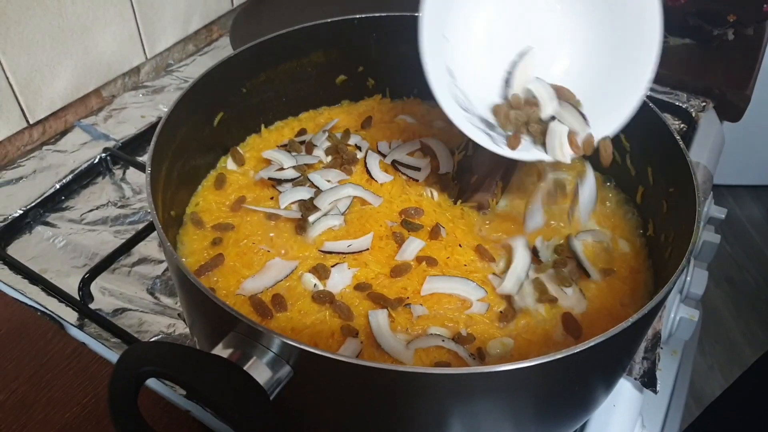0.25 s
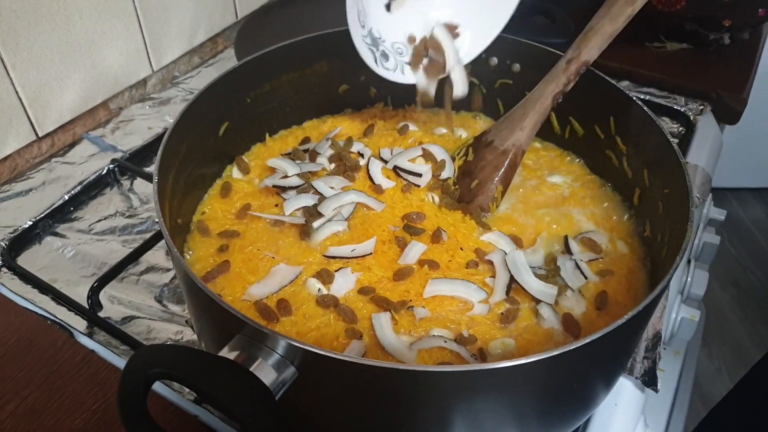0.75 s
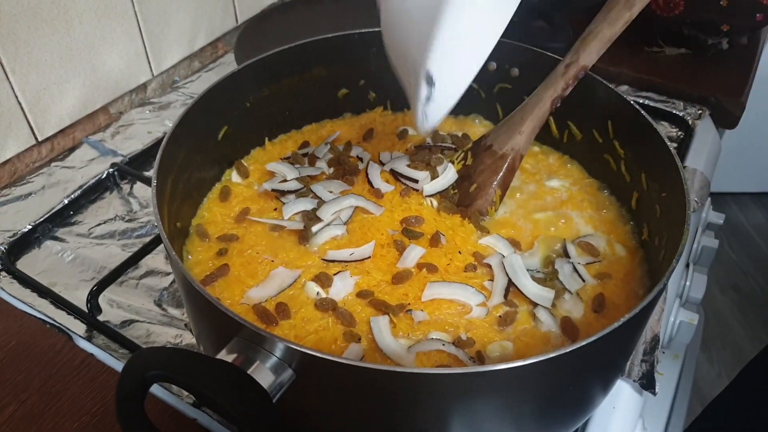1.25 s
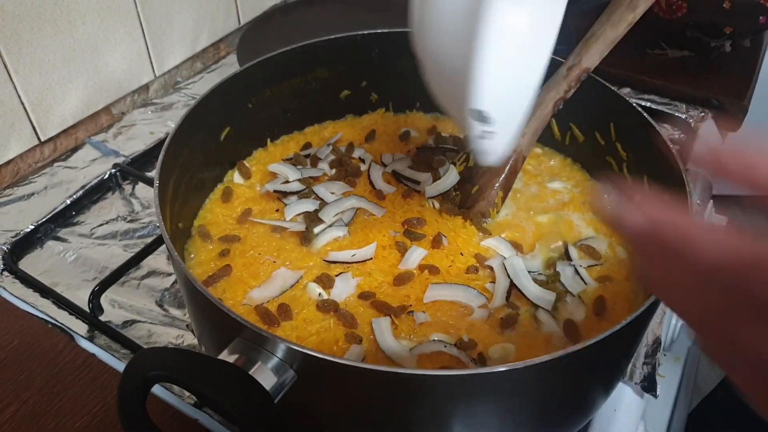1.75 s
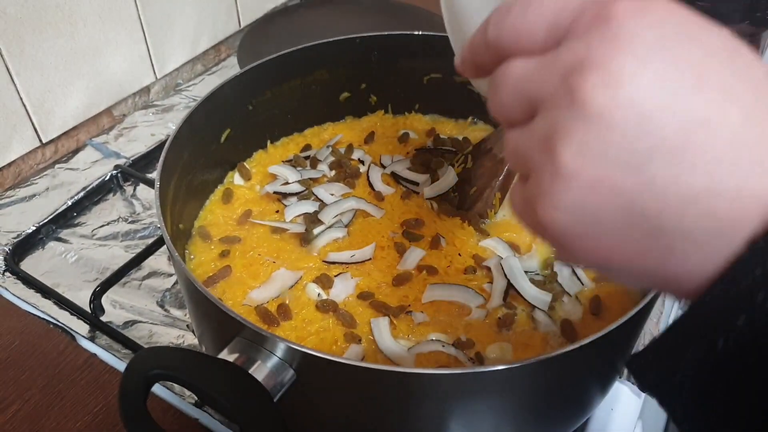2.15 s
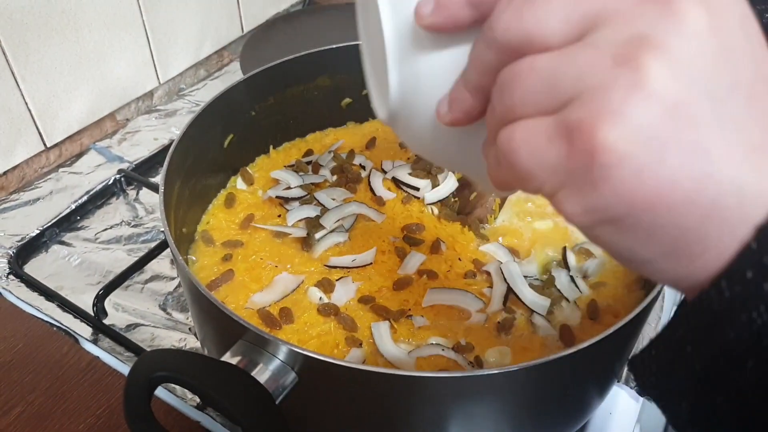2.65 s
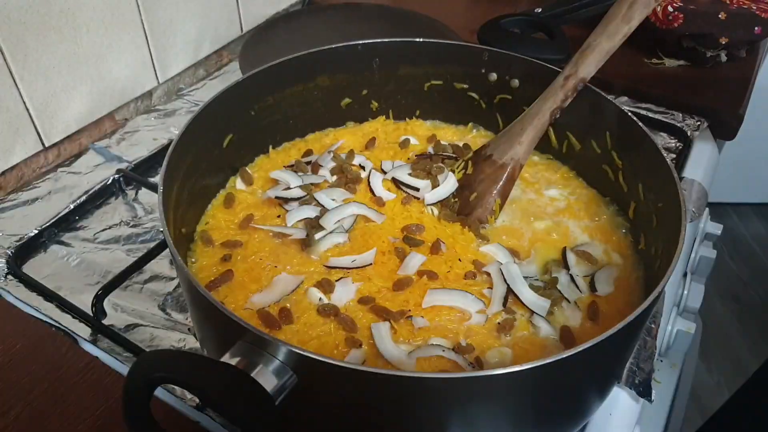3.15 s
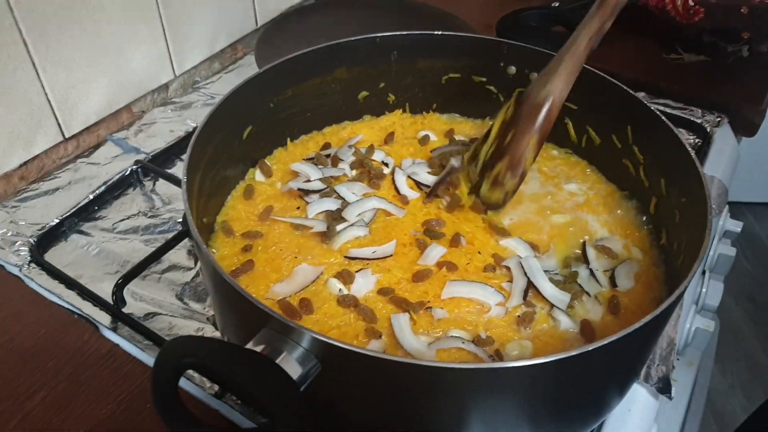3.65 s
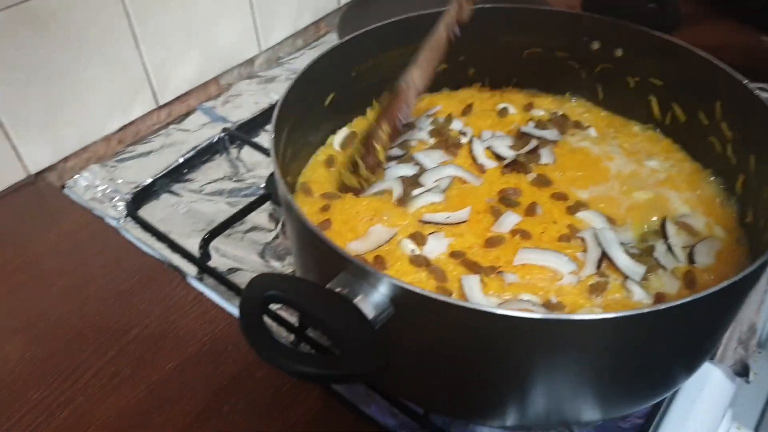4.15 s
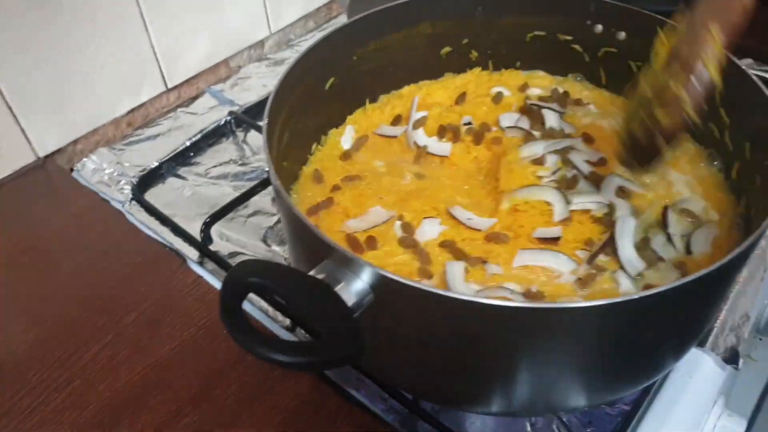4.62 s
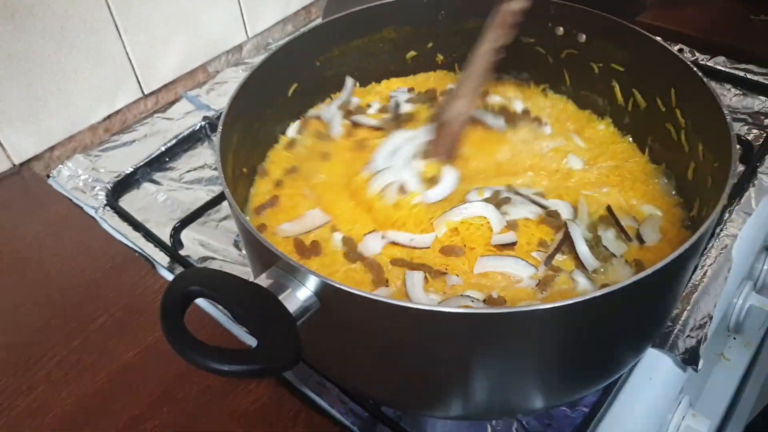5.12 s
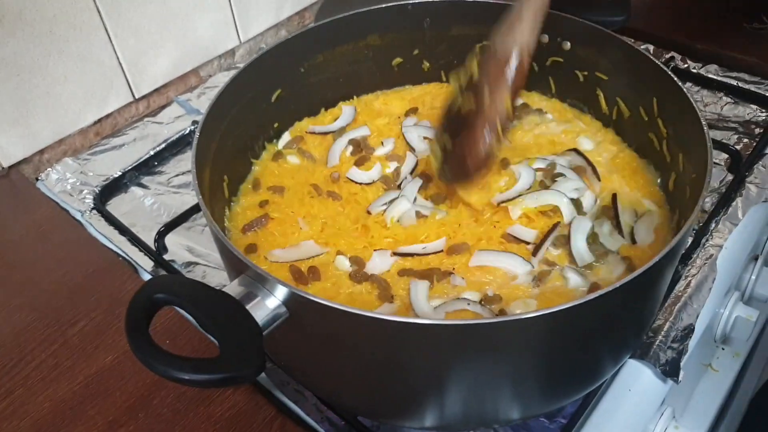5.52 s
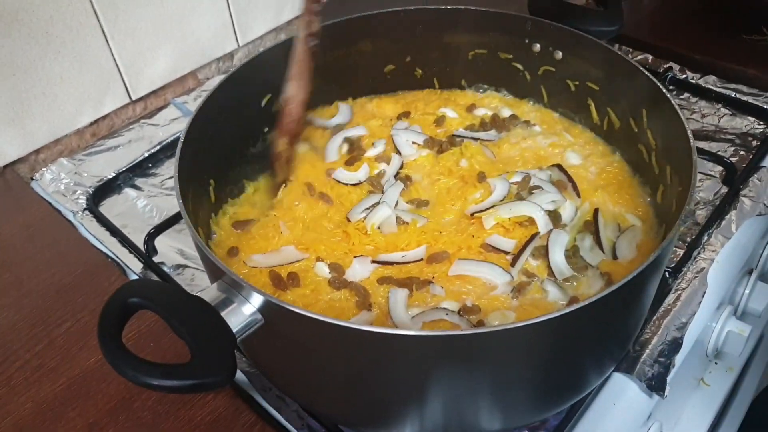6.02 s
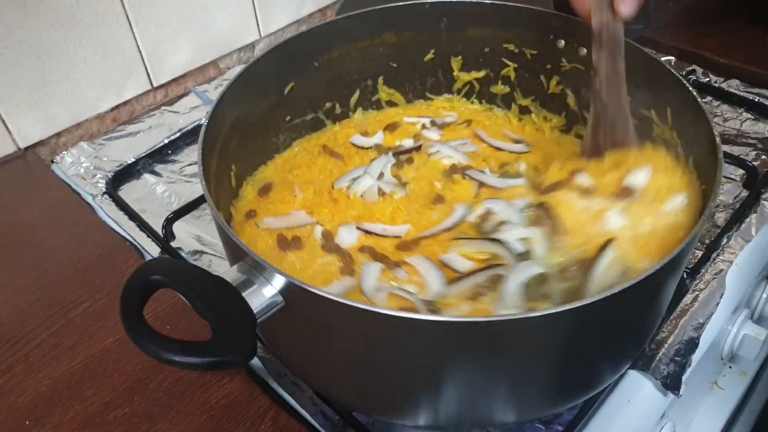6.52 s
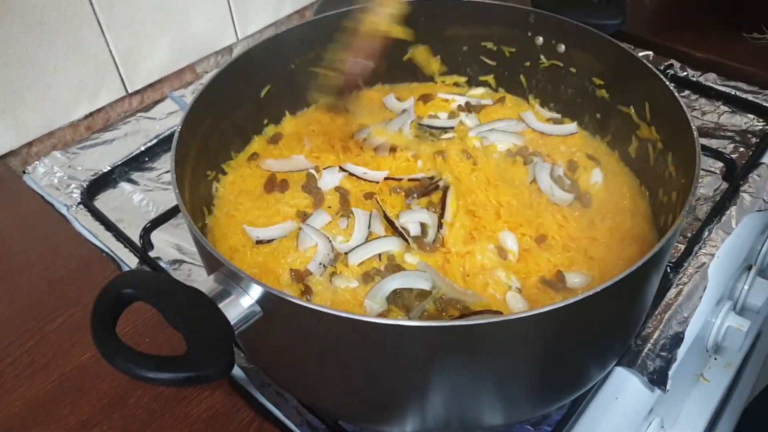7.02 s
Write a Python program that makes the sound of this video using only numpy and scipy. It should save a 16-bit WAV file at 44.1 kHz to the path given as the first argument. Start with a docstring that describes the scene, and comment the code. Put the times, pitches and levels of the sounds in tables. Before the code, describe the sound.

Close in a small kitchen, thick wet rice simmers in a steel pot: dense soft bubbling, fine fizz, single plops and droplets spitting on hot metal, with a faint low gas flame. Near the middle a wooden spoon strikes sharply and the pot rings briefly. Stirring follows, with hollow drags, duller knocks and wet bumps. Heard in stereo by a nearby phone microphone.

```python
"""Wet rice simmers in a steel pot: dense coloured noise and clicks, with single bubbles and droplets on top.
A gas flame rumbles below, as low filtered noise.
A wooden spoon knocks the floor and wall (noise bursts plus dying sines) and drags through the rice
(noise through a gliding hollow resonance, with short wet bumps), so the steel rings.
Two microphone ports of a phone hear it from close by in a small kitchen."""
import sys
import numpy as np
from scipy import signal
from scipy.fft import rfft, irfft, next_fast_len
from scipy.io import wavfile
from scipy.ndimage import uniform_filter1d

SR = 44100
rng = np.random.default_rng(int(sys.argv[2]) if len(sys.argv) > 2 else 0)


def store_wav(level_fs):
    """Save 16-bit WAV to argv[1]."""
    pcm = np.round(np.clip(np.atleast_2d(level_fs), -1, 1) * 32767)
    wavfile.write(sys.argv[1], SR, pcm.T.astype(np.int16))


N = 320871


def amp(db):
    """Decibels to amplitude factor."""
    return 10 ** (np.asarray(db) / 20)


def evened(x):
    """Scale to RMS 1."""
    return x / np.sqrt(np.mean(x ** 2) + 1e-20)


def read(points, hz):
    """Interpolate (Hz, value) points over log frequency."""
    point_hz, value = np.transpose(points)
    return np.interp(np.log(hz + 1), np.log(point_hz + 1), value)


def add(mix, start_s, sound):
    """Add a sound to the mix in place, cut at the end of the mix."""
    part = mix[round(start_s * SR):][:len(sound)]
    part += sound[:len(part)]


def coloured(x, spectrum):
    """Minimum-phase filter of energy 1: a click starts sharply and rings afterwards."""
    hz = abs(np.fft.fftfreq(4096, 1 / SR))
    log_gain = np.log(amp(np.maximum(read(spectrum, hz), -100)))
    taps = np.fft.ifft(np.exp(np.conj(signal.hilbert(log_gain)))).real[:2048]
    return signal.oaconvolve(x, taps / np.linalg.norm(taps))[:len(x)]


def resonate(x, hz, width_hz):
    """Resonance on a fixed or gliding pitch: shift it down to 0 Hz, smooth, shift back."""
    turn = np.exp(2j * np.pi * np.cumsum(hz * np.ones(len(x))) / SR)
    pole = np.exp(-np.pi * width_hz / SR)
    smoothed = signal.lfilter([1 - pole], [1, -pole], x / turn)
    return 2 * (turn * smoothed).real


def ringing(hz, db, t60_s):
    """Half a second of summed, exponentially dying sines, one a mode."""
    t = np.arange(SR // 2)[:, None] / SR
    return (amp(db - 60 * t / t60_s) * np.sin(2 * np.pi * hz * t)).sum(1)


def grains(per_s, spread_db):
    """Random clicks of either sign, a few of them large."""
    sign = rng.choice([-1, 1], N)
    size = amp(spread_db * np.minimum(rng.exponential(1, N), 4))
    return sign * size * (rng.random(N) < per_s / SR)


def puff(decay_s, rise_s=0.00018):
    """Noise with a linear rise and an exponential decay of at least 0.5 ms."""
    t = np.arange(SR // 8) / SR
    noise = rng.standard_normal(len(t))
    return noise * np.exp(-t / max(decay_s, .0005)) * np.minimum(t / rise_s, 1)


def uneven(size):
    """Slow noise of RMS 1: white noise smoothed twice over size samples."""
    return evened(uniform_filter1d(uniform_filter1d(rng.standard_normal(N), size), size))


def scattered_rows(count, db):
    """Random start seconds, levels near db, and pitch factors."""
    s, size, pitch = rng.random((count, 3)).T
    return s * N / SR, db + 2.2 * (size - .5), 2 ** (1.5 * pitch - .4)


# How hard the pot simmers. Each row: time in s, bubbling level in dB, fizz level in dB.
SIMMER_LEVELS = [(0, -52.5, -53), (.65, -49, -52), (2.3, -49.5, -51), (3.8, -48, -51), (5.3, -49.5, -52),
                 (6.25, -48, -50.5), (6.7, -50.5, -48), (6.9, -53.5, -53), (7.27, -53, -52)]
# Spectrum of the small bubbles. Each row: frequency in Hz, density in dB per Hz.
BUBBLING_SPECTRUM = [(88, -35), (150, -0.5), (400, -2.5), (558, 0), (659, -5.5), (875, -5), (1590, -11),
                     (2450, -13.5), (3420, -19), (5370, -46), (8000, -33), (10400, -98), (17600, -120)]
# Spectrum of water on hot steel, including the colour of the microphone.
# Each row: frequency in Hz, density in dB per Hz.
FIZZ_SPECTRUM = [(1760, -11), (3000, -9.5), (5490, -8.5), (7410, -21), (7830, -40), (8160, -21),
                 (8750, -14), (10500, -7), (13700, -3), (15800, -3.5)]
# Spectrum of the gas flame. Each row: frequency in Hz, density in dB per Hz.
FLAME_SPECTRUM = [(12, -57), (20, -40), (40, -7.5), (65, 0), (155, -2), (189, -13), (259, -27), (300, -3.5),
                  (390, -18.5), (660, -120)]
FLAME_DB = -51  # RMS


def simmer():
    """Many small bubbles come in clumps; fizz crackles on the hot wall; the flame rumbles steadily."""
    s, *columns = np.transpose(SIMMER_LEVELS)
    bubbling_db, fizz_db = (np.interp(np.arange(N) / SR, s, column) for column in columns)
    clumps = uneven(size=900)
    paths = []
    for path in range(2):  # spread over the whole pot, so each path carries other bubbles
        bubbles = rng.standard_normal(N) + 0.7 * evened(grains(per_s=600, spread_db=4.0))
        fizz = rng.standard_normal(N) + 0.26 * evened(grains(per_s=750, spread_db=1.0))
        flame = rng.standard_normal(N)
        paths.append(amp(bubbling_db + 1.76 * clumps) * evened(coloured(bubbles, BUBBLING_SPECTRUM))
                     + amp(fizz_db + 1.6 * clumps) * evened(coloured(fizz, FIZZ_SPECTRUM))
                     + amp(FLAME_DB) * evened(coloured(flame, FLAME_SPECTRUM)))
    return np.array(paths)


# Larger bubbles that burst, and short wet bumps under the dragging spoon. Each row: start in s,
# peak of the body in dB, starting pitch in Hz, decay in ms, spray against body in dB before colouring.
BURST_EVENTS = [(0.07, -48.5, 1820, 4.6, 9.5), (0.203, -42, 790, 6.8, -1), (0.329, -42.5, 797, 7.5, 2),
                (0.455, -35, 840, 5.4, -18), (0.802, -33, 930, 7.1, -9), (0.942, -31, 1250, 4, -4.5),
                (1.098, -42, 1870, 3, -9), (1.121, -38.5, 1010, 4, -12), (1.135, -33.5, 825, 1.1, -21),
                (1.312, -34.5, 1000, 4.3, -8), (1.325, -38.5, 820, 6.6, 2), (1.359, -34.5, 960, 3, -18),
                (1.376, -45, 900, 3.4, -6), (1.664, -45, 920, 4.9, 11.5), (1.995, -37.5, 850, 5.7, -13),
                (2.081, -36, 850, 3.1, -7), (2.896, -36, 660, 2.3, -18), (3.215, -32.5, 354, 8.8, -6),
                (3.368, -39, 880, 2, -15), (3.625, -38, 1860, 3, -2), (3.926, -42, 1140, 8.8, 5),
                (4.917, -46, 2170, 6.7, -5), (5.222, -42.5, 2090, 12, -9), (6.071, -41.5, 1780, 7, 1),
                (6.302, -49, 750, 4.2, -18), (6.35, -42, 700, 4.3, -18), (6.37, -51, 750, 6.1, -22),
                (6.449, -54, 730, 9.1, -18), (6.608, -33.5, 2330, 3.3, -14), (6.654, -33.5, 1290, 3.8, -18),
                (6.746, -36.5, 1220, 7.3, 2.5)]
# Spectrum of the spray of a burst. Each row: frequency in Hz, density in dB per Hz.
SPRAY_SPECTRUM = [(200, -14), (500, 12), (1200, 0), (2600, 6), (4000, -14), (7800, -23), (12000, -11),
                  (16000, -10)]
# the bursts left to chance; level and pitch scatter around these
SMALL_BURST_DB, SMALL_BURST_HZ, SMALL_BURST_MS, SMALL_SPRAY_DB = -52.5, 900, 3.7, 1


def bursts():
    """A bubble or wet bump gives a puff around a rising pitch and a little spray of noise."""
    body, spray = np.zeros(N), np.zeros(N)
    starts, levels, pitches = scattered_rows(count=16, db=SMALL_BURST_DB)
    small = [(*row, SMALL_BURST_MS, SMALL_SPRAY_DB)
             for row in zip(starts, levels, SMALL_BURST_HZ * pitches)]
    for s, db, hz, decay_ms, spray_db in [*BURST_EVENTS, *small]:
        air = puff(decay_ms / 1000, rise_s=0.6 * decay_ms / 1000)
        pitch_rise = 1 + np.minimum(10 * np.arange(len(air)) / SR, .4)
        tone = resonate(air, hz * pitch_rise, 0.29 * hz)
        add(body, s, amp(db) * tone / abs(tone).max())
        add(spray, s, amp(db + spray_db) * air)
    return body + coloured(spray, SPRAY_SPECTRUM)


# Droplets that spit on hot steel. Each row: start in s, level in dB before colouring.
SPIT_EVENTS = [(0.212, -38.5), (0.231, -44), (0.358, -46), (0.635, -43), (0.679, -37.5), (0.77, -43),
               (0.8195, -36), (0.943, -32), (2.411, -38.5), (2.667, -39), (3.721, -36.5), (3.9386, -34.5),
               (4.328, -39.5), (6.298, -35), (6.748, -35)]
SPIT_DECAY_S = 0.0094
SMALL_SPIT_DB = -59  # the droplets left to chance scatter around this


def spits():
    """A droplet on hot steel gives a short bright crack of noise."""
    out = np.zeros(N)
    small = zip(*scattered_rows(count=16, db=SMALL_SPIT_DB)[:2])
    for s, db in [*SPIT_EVENTS, *small]:
        add(out, s, amp(db) * puff(SPIT_DECAY_S, rise_s=0.0011))
    return coloured(out, FIZZ_SPECTRUM)


# Spoon on pot. Each row: start in s, blow level in dB, wood tone in Hz, thud against blow in dB,
# side of the grate 0 to 1, bare steel 0 to 1 (0 is rice), place 0 floor, 1 low wall, 2 high wall,
# ring level in dB, crack against blow in dB.
KNOCK_EVENTS = [(3.959, -8, 1140, -10, 0, 0.95, 0, -24.5, -8),
                (3.992, -23.5, 590, -23, 0, 1, 0.32, -37, -20),
                (4.033, -25, 1780, -3, 0.1, 0.92, 1.2, -41, -7.5),
                (4.074, -33, 1230, -4, 0, 0.7, 0.14, -47, -12),
                (4.178, -40, 1942, -30, 0, .85, 1, -38, -40), (4.232, -36, 2350, -20, 0, 0.85, 0, -35, -35),
                (4.546, -20, 427, -7, 0, 0.25, 0, -22, -50), (4.56, -17, 830, -11, .3, 0.2, 0, -23, -55),
                (4.589, -30, 870, -4, 0, 0.2, 0, -35, -40), (4.772, -28, 400, 1, 0.64, 0.08, 0, -31.5, -45),
                (4.79, -42, 175, 10.5, 1, 0, 0, -45, -45),
                (5.446, -21, 2100, -20, 0, 1, 0.95, -29.5, -10.5),
                (5.466, -25, 1900, -24, 0, 0.8, 1, -38, -22),
                (5.642, -27.5, 2240, -29, 0, 0.93, 1.76, -34, -14)]
# Modes of the steel pot, one column a mode. Rows: frequency in Hz, floor blow in dB,
# low wall blow in dB, high wall blow in dB, rubbed in dB, t60 in s.
POT_MODES = [(415, 851, 1707, 1868, 1958, 2326, 3295, 3862, 4500, 4953, 5157, 5712, 6880, 9320, 11300, 12030, 13435, 14930),
             (-10, -13, -6, -26, -22, -1, -25, -14, -16, -30, -13, -8, -30, -18, -22, -30, -30, -24),
             (-20, -12, -18, -14, 0, -6, -6, -26, -22, -30, -19, -22, -18, -20, -15, -14, -9, -15),
             (-14, -20, -30, -5, -24, -9, -6, -8, -30, -9, -24, -4, -30, -17, -30, -5, -13, -18),
             (-30, -14, -30, -5, -30, -15, -24, -20, -30, -13, -30, -1, -30, -7, -22, -24, 0, -4),
             (.27, .3, .18, .4, .2, .4, .22, .24, .12, .18, .22, .24, .17, .4, .15, .09, .4, .3)]
# The pot rocking on its grate, one column a mode. Rows: frequency in Hz, one side in dB,
# other side in dB, t60 in s.
GRATE_MODES = [(129, 170, 195, 88), (0, -6, -7, -14), (-12, -2, -14, -4), (.25, .2, .25, .5)]
# Spectrum of the wooden blow. Each row: frequency in Hz, density in dB per Hz.
WOOD_SPECTRUM = [(150, -36), (300, 8), (1200, -3.5), (2500, -2.5), (4000, -13.5), (6000, -17), (8000, -79)]
CLATTER_DECAY_S, CLATTER_DOUBLES_DB = 0.0016, -11  # decay at 0 dB; doubles for a blow this much softer
BARE_RISE_S, RICE_RISE_S = 0.002, 0.004  # rice softens the start of a blow
RICE_RING_DB_PER_OCTAVE = -14  # ring lost through rice, above the lowest mode
RICE_LOWPASS_HZ = 1300  # wood lowpass through rice; 8 times higher on bare steel
SHIMMER_DECAY_S, SHIMMER_DB = 0.015, -6  # small modes of the steel, too dense to tell apart


def knocks():
    """Wood clatters on steel; the pot rings by where it is struck, rice muffles it, and the grate thuds."""
    hz, *places_db, _, t60_s = np.array(POT_MODES)
    rock_hz, one_db, other_db, rock_t60_s = np.array(GRATE_MODES)
    t = np.arange(SR // 2) / SR
    heave = 1 - np.exp(-(t / 0.0063) ** 2)  # the heavy pot takes a moment to move
    swing = 1 - np.exp(-t / 0.0017)  # the steel swings freely once the spoon has left it
    clatter, ring = np.zeros((2, N))
    for s, db, wood_hz, thud_db, side, bare, place, ring_db, crack_db in KNOCK_EVENTS:
        rise_s = np.interp(bare, (0, 1), (RICE_RISE_S, BARE_RISE_S))
        blow = puff(CLATTER_DECAY_S * 2 ** (db / CLATTER_DOUBLES_DB), rise_s)

        mode_db = np.array([np.interp(place, (0, 1, 2), column) for column in np.transpose(places_db)])
        rice_db = RICE_RING_DB_PER_OCTAVE * (1 - bare) * np.log2(hz / hz[0])
        add(ring, s, swing * ringing(hz, ring_db + mode_db + rice_db, t60_s))

        rock_db = thud_db + one_db + side * (other_db - one_db)
        sound = heave * ringing(rock_hz, rock_db, rock_t60_s)

        tone = resonate(blow, wood_hz, 0.086 * wood_hz)
        wood = .5 * tone / abs(tone).max() + amp(-3.0) * coloured(blow, WOOD_SPECTRUM)
        lowpass = signal.butter(3, RICE_LOWPASS_HZ * 8 ** np.clip(bare, 0, 1), fs=SR)
        add(sound, 0, signal.lfilter(*lowpass, wood))

        crack = coloured(blow + amp(SHIMMER_DB) * puff(SHIMMER_DECAY_S), FIZZ_SPECTRUM)
        crack = signal.lfilter([1], [1, -.65], crack)  # duller than a spitting droplet
        add(sound, 0, amp(crack_db) * crack)
        add(clatter, s, amp(db) * sound)
    return clatter, ring


# Strokes of the spoon through the rice. Each row: start in s, length in s, share of length to the
# hardest push, drag level in dB, first hollow in Hz, last hollow in Hz, rice rustle against hollow
# in dB, wet swish level in dB, steel singing level in dB.
STROKE_EVENTS = [(4.07, 0.575, 0.45, -40.5, 285, 415, -2, -53.5, -64),
                 (5.034, 0.18, 0.64, -40, 408, 435, -10, -75, -80),
                 (5.606, 0.42, 0.45, -39.5, 497, 570, 13, -45, -47),
                 (6.278, 0.15, 0.65, -43, 580, 666, -10, -57, -73),
                 (6.389, 0.38, 0.23, -41, 670, 560, -3, -48.5, -73)]
EASE_DB = -15.5  # push at both ends against the hardest, before the end fades
LUMPS_DB = 1.3  # RMS unevenness from lumps of rice
BLURRED_HZ = 620  # a hollow this high is as wide as it is high


def strokes():
    """The spoon slips unevenly over grains and steel: hollow rumble, wet swish, faintly singing pot."""
    hz, *_, rubbed_db, t60_s = np.array(POT_MODES)
    drag, rub = np.zeros(N), np.zeros(N)
    slips = rng.standard_normal(N) + 1.1 * evened(grains(per_s=700, spread_db=2.0))
    slips *= amp(LUMPS_DB * uneven(size=1200))
    for (s, length_s, share, drag_db, first_hz, last_hz,
         rustle_db, swish_db, sing_db) in STROKE_EVENTS:
        u = np.linspace(0, 1, round(length_s * SR))
        ease = np.interp(u, (0, np.clip(share, .05, .95), 1), (1, 0, 1)) ** 2
        push = amp(EASE_DB * ease) * signal.windows.tukey(len(u), .15)

        slip = slips[round(s * SR):][:len(u)]
        hollow_hz = first_hz + (last_hz - first_hz) * u
        width_hz = hollow_hz.mean() ** 2 / BLURRED_HZ
        hollow = resonate(resonate(slip, hollow_hz, width_hz), hollow_hz, width_hz)
        rustle = evened(coloured(slip, BUBBLING_SPECTRUM))
        rumble = evened(evened(hollow) + amp(rustle_db) * rustle)
        swish = evened(coloured(rng.standard_normal(len(u)), FIZZ_SPECTRUM))
        add(drag, s, (amp(drag_db) * rumble + amp(swish_db) * swish) * push)
        add(rub, s, amp(sing_db) * slip * push)
    song = ringing(hz, rubbed_db, t60_s)
    return drag, signal.oaconvolve(rub, song / np.linalg.norm(song))[:N]


# Decay of the kitchen before stretching. Each row: frequency in Hz, t60 in s.
KITCHEN_DECAY = [(100, 0.27), (500, 0.44), (2000, 0.38), (6000, 0.25), (14000, 0.31)]


def tail(stretch):
    """Kitchen reverberation: noise of energy 1 whose bands die at stretched t60."""
    hz, t, z = signal.stft(rng.standard_normal(SR // 2), SR, nperseg=128)
    decay_db = -60 * t / (stretch * read(KITCHEN_DECAY, hz)[:, None])
    out = signal.istft(z * amp(decay_db), SR, nperseg=128)[1]
    return out / np.linalg.norm(out)


def scene():
    """Row 0 is the sound at the phone, row 1 the sound that comes along other paths."""
    (clatter, ring), (drag, song) = knocks(), strokes()
    wet = bursts() + spits()
    delayed_tail = np.pad(tail(0.98), (150, 0))  # 150 samples late
    room = amp(-9.0) * signal.oaconvolve(0.9 * clatter + wet, delayed_tail)[:N]
    near = clatter + wet + room + drag
    scattered = signal.oaconvolve(near, tail(0.49))[:N]
    steel = signal.hilbert(ring + song)  # row 1 carries each mode a quarter turn apart, at even strength
    return np.array([near + steel.real, scattered + steel.imag]) + simmer()


# Likeness of the two ports. Each row: frequency in Hz, left-right likeness 0 to 1.
PORT_LIKENESS = [(60, 0.94), (200, 1), (400, 0.82), (800, 0.69), (1500, 0.77), (5000, 0.16), (9000, 0.087),
                 (15000, 0.065)]
# Phase between the ports. Each row: frequency in Hz, lead of the left port in radians.
LEFT_LEAD = [(0, 0), (900, 0.89), (1640, 1.5), (2400, 0.88), (3700, 4.5), (5800, 7.5), (8100, 17),
             (16000, 34)]
# Level between the ports. Each row: frequency in Hz, left over right in dB.
LEFT_OVER_RIGHT = [(60, 0), (110, 4), (200, 1), (380, 0), (700, 5.5), (1290, 4), (2380, 0.5), (4400, -0.5),
                   (8120, -1.5), (15000, 14.5)]
EDGE_HZ = 15750  # upper band limit


def record(dry):
    """The right port hears the pot later, duller, partly scattered; small capsules lose deep bass."""
    size = next_fast_len(N + SR)
    hz = np.fft.rfftfreq(size, 1 / SR)
    near, scattered = rfft(dry, size)
    same = np.clip(read(PORT_LIKENESS, hz), 0, 1)
    tilt = amp(-read(LEFT_OVER_RIGHT, hz))
    turn = np.exp(-1j * np.interp(hz, *np.transpose(LEFT_LEAD)))
    right = tilt * turn * (same * near + np.sqrt(1 - same ** 2) * scattered)
    balance = 2 / np.sqrt(1 + tilt ** 2 + tilt)
    bass_cut = 1 / np.sqrt(1 + (45 / (hz + 1)) ** 4)
    ports = irfft(np.array([near, right]) * balance * bass_cut, size)[:, :N]
    lowpass = signal.firwin(511, EDGE_HZ, window=("kaiser", 9), fs=SR)
    return signal.oaconvolve(ports, lowpass[None], "same")


dry = scene()
out = record(dry)
store_wav(out)
```